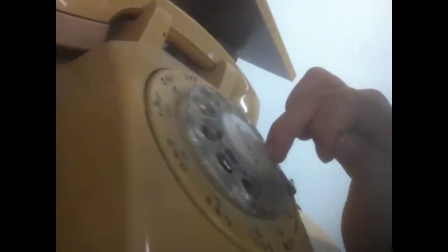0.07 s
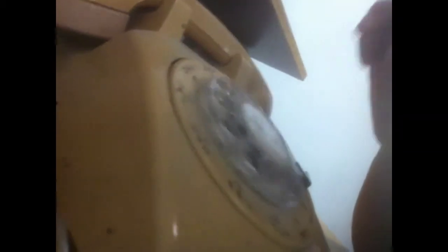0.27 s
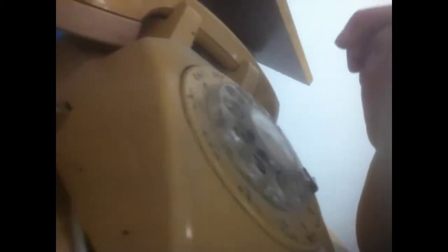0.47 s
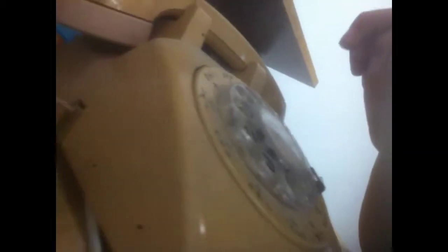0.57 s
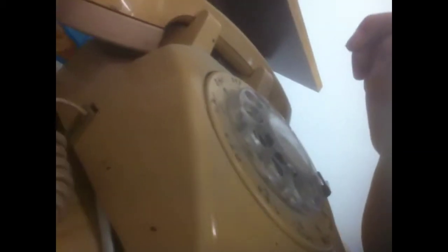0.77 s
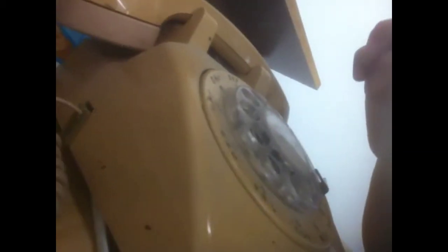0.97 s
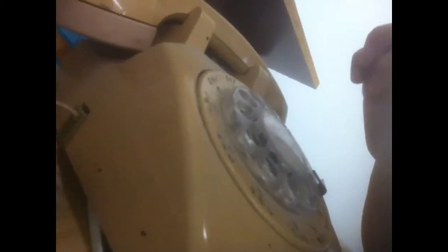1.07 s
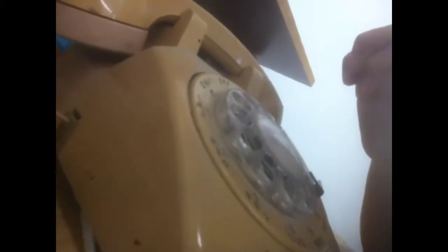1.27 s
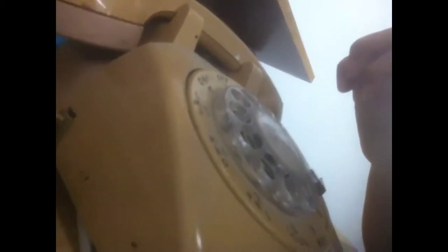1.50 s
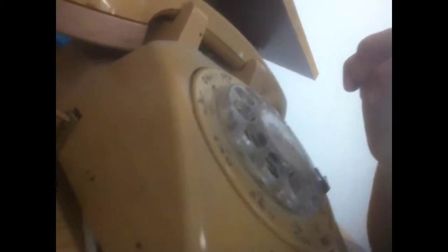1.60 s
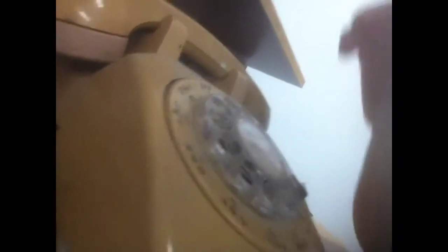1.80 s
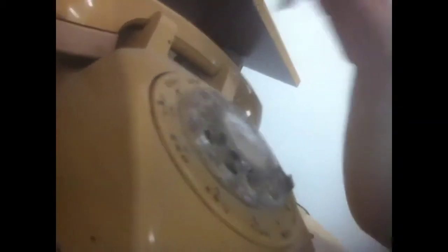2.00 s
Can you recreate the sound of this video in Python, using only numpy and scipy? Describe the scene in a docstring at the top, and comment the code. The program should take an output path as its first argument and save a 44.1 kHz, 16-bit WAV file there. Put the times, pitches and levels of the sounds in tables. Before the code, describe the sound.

A rotary telephone dial is released with a light knock, spins back with a short, rattling whirr and stops with a sharp click. A few faint handling bumps follow, heard close up in a small, quiet room.

```python
"""A rotary telephone's dial runs back, heard close up on one microphone in a small, quiet room.
A finger slips off and the spring returns the wheel: gears whirr, the governor rasps, and cam and
contacts clack in the plastic case. The wheel snaps against its stop, thumping the desk and faintly
stirring the bell. A few soft handling bumps follow over the room's hush."""
import sys
import numpy as np
from scipy import signal
from scipy.fft import rfft, irfft
from scipy.io import wavfile

SR = 44100
rng = np.random.default_rng(int(sys.argv[2]) if len(sys.argv) > 2 else 0)


def store_pcm(level_fs):
    """Save levels as 16-bit WAV."""
    pcm = np.round(np.clip(level_fs, -1, 1) * 32767).astype(np.int16)
    wavfile.write(sys.argv[1], SR, np.atleast_2d(pcm).T)


N = 90404

# resonances of the plastic case (frequency [Hz], width [Hz], level [dB])
CASE_MODES = [(112, 22, -15), (165, 30, -9), (235, 40, -12), (309, 19, 2.5), (360, 30, -7), (424, 30, 2),
              (482, 30, -6), (554, 26, 2.5), (618, 22, -2.5), (652, 20, -4.5), (790, 60, -14),
              (975, 90, -6.5)]
# resonances of the metal dial frame (frequency [Hz], width [Hz], level [dB])
FRAME_MODES = [(915, 24, -1), (1190, 42, 7), (1255, 30, 5), (1415, 33, 2), (1482, 32, 3.5),
               (1581, 44, -2.5), (1830, 136, -8), (2846, 160, -8.5), (3153, 110, -3.5), (3420, 180, -8.5),
               (3676, 90, -8), (4460, 89, -14), (4900, 90, -13)]
# spectrum of a small contact's tick (frequency [Hz], level [dB])
TICK_SPECTRUM = [(1000, -44), (2500, 3), (3500, 7), (4500, 1), (6500, -1), (10000, -7), (12000, -29),
                 (15500, -30)]
TICK_T60_S = 0.034


def amp(db):
    """Decibels to gain."""
    return 10 ** (np.asarray(db) / 20)


def along(points, hz):
    """Interpolate (Hz, value) points on a log frequency axis."""
    f, v = np.transpose(points)
    return np.interp(np.log(hz + 1e-3), np.log(f), v)


def fade(t, t60):
    """Exponential decay, 60 dB in t60 seconds."""
    return np.exp(-np.log(1000) * t / t60)


def clock():
    """Time of each sample in seconds."""
    return np.arange(N) / SR


def bins():
    """Frequencies of the filter grid in Hz."""
    return np.fft.rfftfreq(2 * N, 1 / SR)


def colour(points):
    """Minimum-phase response through (Hz, dB) points."""
    cepstrum = irfft(np.log(amp(along(points, bins()))))
    cepstrum[1:N] *= 2
    cepstrum[N + 1:] = 0
    return np.exp(rfft(cepstrum))


def resonances(modes):
    """Response of (Hz, width, dB) resonances, summed with alternating signs."""
    f = bins()
    return sum((-1) ** k * amp(db) * 1j * f * width / (hz * hz - f * f + 1j * f * width)
               for k, (hz, width, db) in enumerate(modes))


def filtered(x, response):
    """Apply a frequency response to x."""
    return irfft(rfft(x, 2 * N) * response)[..., :N]


def through(x, response):
    """Filter x with the response scaled to unit power."""
    return filtered(x, response) / np.sqrt(np.mean(abs(response) ** 2))


def bursts(times, levels_db, t60, rise_s=0.0004):
    """Each contact chatters: a short, decaying burst of noise."""
    envelope = np.zeros(N)
    for onset, db in zip(times, levels_db):
        age = np.maximum(clock() - onset, 0)
        envelope += amp(db) * fade(age, t60) * (1 - np.exp(-age / rise_s))
    return envelope * rng.standard_normal(N)


def knocks(times, levels_db, push_db, chatter_db):
    """Each blow is a clean push followed by the chatter of the contact."""
    # plastic contacts have little top (frequency [Hz], gain [dB])
    softness = [(3000, -0.5), (9000, -7.5), (12000, -23), (15500, -27)]
    samples = np.round(np.asarray(times) * SR).astype(int)
    pushes = np.bincount(samples, amp(levels_db + push_db), N)
    chatter = bursts(times, levels_db + chatter_db, t60=0.018)
    return filtered(pushes + chatter, colour(softness))


def struck(modes, spread_db=2.5):
    """The mechanism turns, so each blow shares its force differently among the resonances."""
    hz, width, db = np.transpose(modes)
    return resonances(zip(hz, width, db + spread_db * rng.standard_normal(len(db))))


def ping(modes, at_s):
    """Resonances ring out after one clean impulse."""
    return through(signal.unit_impulse(N, round(at_s * SR)), resonances(modes))


def hush():
    """Room tone: steady noise with a faint, narrow hum."""
    # spectrum of the room tone (frequency [Hz], level [dB])
    air_spectrum = [(13, -77), (22, -18), (114, 0), (146, -5), (172, -0.5), (333, -5.5), (361, -4.5),
                    (462, -8.5), (997, -13), (1080, -2.5), (1180, -15), (1390, -11), (2600, -17.5),
                    (3820, -18), (15500, -24)]
    # band of the hum (frequency [Hz], width [Hz], level [dB])
    hum_band = [(1118, 23, 0)]
    air, hum = rng.standard_normal((2, N))
    return amp(-58.5) * through(air, colour(air_spectrum)) + amp(-76) * through(hum, resonances(hum_band))


def room(x, delay_s=0.006):
    """Nearby walls send a short tail back to the microphone, weak in the bass."""
    # reverberation time (frequency [Hz], t60 [s])
    decay = [(120, .3), (500, .3), (1500, .24), (5000, .21), (12000, .19)]
    # colour of the reflections (frequency [Hz], gain [dB])
    walls = [(150, -13), (600, -1.5), (1500, -2), (6000, -2.5), (12000, 2)]
    hz, t, noise = signal.stft(rng.standard_normal(SR // 2), SR, nperseg=256)
    shaped = noise * fade(t, along(decay, hz)[:, None]) * amp(along(walls, hz))[:, None]
    tail = signal.istft(shaped, SR, nperseg=256)[1]
    tail = np.pad(tail, (round(delay_s * SR), 0))
    return signal.fftconvolve(x, tail / np.linalg.norm(tail))[:N]


def handling():
    """Dull, soft bumps of handling, each centred on its own pitch."""
    # bumps (time [s], level [dB], pitch [Hz])
    bumps = [(1.026, -52.5, 368), (1.458, -45, 310), (1.464, -46.5, 620), (1.528, -52, 218),
             (1.579, -47, 330), (1.622, -51.5, 590), (1.686, -49, 181), (1.836, -52.5, 297)]
    # spectrum of a bump (frequency [multiple of its pitch], level [dB])
    shape = [(.3, -26), (.65, -12), (.85, 0), (1.2, 0), (1.7, -9), (3.5, -21), (10, -45)]
    out = np.zeros(N)
    for onset, db, hz in bumps:
        spectrum = [(ratio * hz, level) for ratio, level in shape]
        out += through(bursts([onset], [db], t60=0.073, rise_s=0.0038), colour(spectrum))
    return out


def bell():
    """Each jolt leaves the bell and chassis humming faintly."""
    # jolts of the release and the stop (time [s], gain [dB])
    jolts = [(.137, -3), (.426, 1)]
    # partials of bell and chassis (frequency [Hz], level [dB], t60 [s])
    partials = [(438, -38.5, .4), (672, -54.5, 1.15)]
    out = np.zeros(N)
    for onset, jolt_db in jolts:
        age = np.maximum(clock() - onset, 0)
        for hz, db, t60 in partials:
            out += amp(jolt_db + db) * fade(age, t60) * np.sin(2 * np.pi * hz * age)
    return out


def finger():
    """The fingertip rubs on the wheel and slips off with small knocks; the wheel scrapes into motion."""
    # slips of the finger (time [s], knock level [dB], tick level [dB])
    slips = [(0.0956, -39, -42.5), (0.0992, -31.5, -69), (0.111, -40, -52), (0.1319, -35.5, -49),
             (0.1358, -27, -52), (0.163, -45, -56), (0.1712, -36, -62)]
    # resonances of the finger wheel (frequency [Hz], width [Hz], level [dB])
    wheel_modes = [(171, 73, -15.5), (320, 94, -5), (448, 114, 2.5), (547, 64, -9), (810, 38, -8),
                   (957, 80, -5.5), (1500, 27, -25), (2750, 33, -23)]
    # skin on the wheel (frequency [Hz], level [dB])
    rub_spectrum = [(200, -4), (520, 8.5), (800, 2), (1300, -4.5), (1600, 13), (2100, -16), (8000, -32)]
    # the wheel starting to slide (frequency [Hz], level [dB])
    scrape_spectrum = [(1500, -18), (2400, -9), (2800, 10), (3400, -17), (7000, -13), (12000, -34)]
    rub_end_s, scrape_start_s, scrape_length_s = 0.13, 0.164, 0.02
    times, knock_db, tick_db = np.transpose(slips)
    t = clock()
    skin, slide = rng.standard_normal((2, N))
    rub = amp(-59) * through(skin * (t < rub_end_s), colour(rub_spectrum))
    swell = np.sin(np.pi * np.clip((t - scrape_start_s) / scrape_length_s, 0, 1))
    scrape = amp(-51.5) * through(slide * swell, colour(scrape_spectrum))
    knock = through(knocks(times, knock_db, push_db=18.5, chatter_db=1.5), resonances(wheel_modes))
    ticks = through(bursts(times, tick_db, TICK_T60_S), colour(TICK_SPECTRUM))
    return rub + scrape + knock + ticks


def gear_train():
    """Gear teeth tick unevenly, shaking case and frame, while the governor's shoes rasp in their cup."""
    # running level of the train (time [s], level [dB])
    run = [(.135, -39), (.165, -47), (.205, -36.5), (0.215, -37), (0.225, -28.5), (.27, -30.5), (.303, -32),
           (.335, -28.5), (.355, -31.5), (0.403, -32), (.424, -28), (0.442, -31)]
    # spectrum of the gears (frequency [Hz], level [dB])
    gear_spectrum = [(50, -29), (100, -21.5), (160, -16), (240, -4), (310, -3), (470, -1.5), (560, 0.5),
                     (760, -5), (1150, -1.5), (1600, -7), (2100, -15.5), (3100, -16.5), (4200, -23.5),
                     (9000, -26), (11000, -29), (13500, -39), (15500, -46)]
    # until the cam engages, the teeth run lightly and sound dull (frequency [Hz], gain [dB])
    unloaded = [(1000, 0.5), (2500, -4.5)]
    # spectrum of the sliding shoes (frequency [Hz], level [dB])
    rasp_spectrum = [(1500, -12), (3000, -9), (5000, 1), (9000, -9), (11000, -6.5), (12000, -20),
                     (13700, -8), (15000, -27)]
    tooth_hz, scatter_teeth, spread_db, engage_s = 334.3, 0.375, 3.5, 0.22
    t = clock()
    times, run_db = np.transpose(run)
    teeth = np.arange(times[0], times[-1], 1 / tooth_hz)
    late, force = rng.standard_normal((len(teeth), 2)).T
    mesh = bursts(teeth + scatter_teeth * late / tooth_hz, spread_db * force, t60=0.014)
    running = (t > times[0]) & (t < times[-1])
    level = amp(np.interp(t, times, run_db))
    drive = level * mesh / np.std(mesh[running])
    drive = np.where(t < engage_s, filtered(drive, colour(unloaded)), drive)
    gears = amp(-3.5) * through(drive, colour(gear_spectrum))
    case = amp(-7) * through(drive, resonances(CASE_MODES))
    frame = amp(-12.5) * through(drive, resonances(FRAME_MODES))
    rasp = amp(-22.5) * through(level * running * rng.standard_normal(N), colour(rasp_spectrum))
    return gears + case + frame + rasp


def clacks():
    """Cam and contacts knock the case, tick, and ring the frame a little differently each time."""
    # blows during the return (time [s], case level [dB], frame level [dB], tick level [dB])
    blows = [(0.2229, -30, -29, -35.5), (0.232, -41, -28, -45), (0.2502, -45, -24.5, -32.5),
             (0.263, -54, -35, -42), (0.2672, -50, -30, -31.5), (.276, -26.5, -27, -44),
             (.284, -23.5, -43, -41), (.311, -54, -30, -41.5), (0.315, -59, -28.5, -41),
             (0.326, -29.5, -30, -39), (.339, -24, -39, -53), (0.3601, -36.5, -25.5, -36.5),
             (.378, -23.5, -30.5, -31.5), (0.3925, -25, -28, -63), (0.398, -33, -44, -44),
             (0.4111, -24.5, -31, -45)]
    times, case_db, frame_db, tick_db = np.transpose(blows)
    frame = np.zeros(N)
    for onset, db in zip(times, frame_db):
        blow = knocks([onset], np.array([db]), push_db=16, chatter_db=7)
        frame += through(blow, struck(FRAME_MODES))
    case = through(knocks(times, case_db, push_db=19, chatter_db=2.5), resonances(CASE_MODES))
    ticks = through(bursts(times, tick_db, TICK_T60_S, rise_s=0.00053), colour(TICK_SPECTRUM))
    return frame + case + ticks


def wheel_stop():
    """The wheel snaps against its metal stop, which rings briefly; the case rocks and the desk thuds."""
    # the wheel hits, seats and rattles (time [s], case level [dB], crack level [dB], snap level [dB])
    hits = [(.422, -41, -21, -23.5), (0.4244, -37, -16.5, -27), (0.4258, -17.5, -23, -52.5),
            (0.4362, -26.5, -33.5, -48), (0.449, -26, -34, -44), (0.493, -36.5, -51, -42.5),
            (0.511, -70, -46, -50.5)]
    # midrange crack of a hit (frequency [Hz], level [dB])
    crack_spectrum = [(180, -17), (300, -14.5), (411, 7), (821, -11.5), (985, 5), (1700, -9), (1970, -4.5),
                      (2650, -4.5), (2830, 4), (3280, -10), (3750, -6.5), (4280, -15.5), (6570, -11.5),
                      (7250, -15), (10400, -23.5), (14000, -55), (15500, -72)]
    # its bright snap (frequency [Hz], level [dB])
    snap_spectrum = [(1500, -0.5), (4000, 9), (7000, 4.5), (10500, 2), (13000, -16), (15500, -21)]
    # resonances of the stop (frequency [Hz], width [Hz], level [dB])
    stop_modes = [(985, 95, 0), (2839, 40, -3)]
    # resonances of the desk under the telephone (frequency [Hz], width [Hz], level [dB])
    desk_modes = [(115.6, 11.5, -1.5), (168.2, 13.3, 1)]
    times, case_db, crack_db, snap_db = np.transpose(hits)
    case = through(knocks(times, case_db, push_db=20, chatter_db=-6.5), resonances(CASE_MODES))
    crack = through(bursts(times, crack_db, t60=0.034), colour(crack_spectrum))
    snap = through(bursts(times, snap_db, t60=0.018, rise_s=0.00018), colour(snap_spectrum))
    ring = amp(-5) * ping(stop_modes, at_s=0.4255)
    thud = amp(-6.5) * ping(desk_modes, at_s=0.431)
    return case + crack + snap + ring + thud


def scene():
    """The telephone at close range, in mono: direct sound well above the reflections and room tone."""
    direct = finger() + gear_train() + clacks() + wheel_stop() + handling()
    return (direct + amp(-11) * room(direct) + bell() + hush())[None]


def record(dry):
    """The microphone chain passes nothing above its band limit."""
    top_hz = 15800
    return filtered(dry, bins() < top_hz)


dry = scene()
out = record(dry)
store_pcm(out)
```